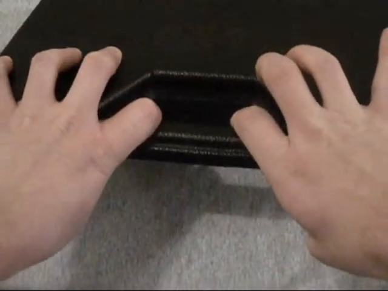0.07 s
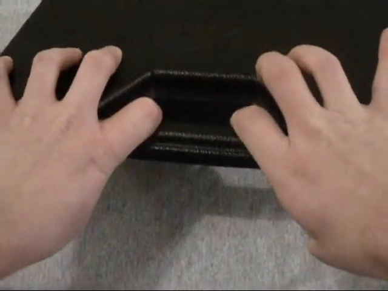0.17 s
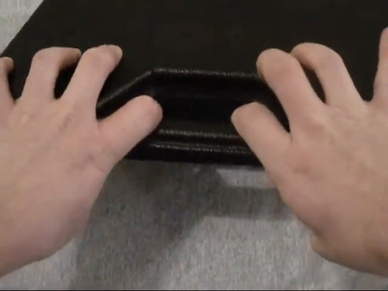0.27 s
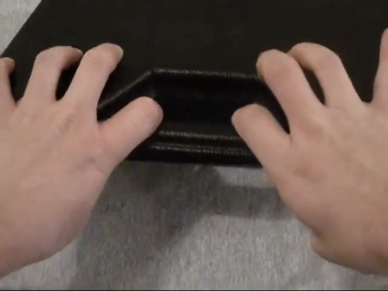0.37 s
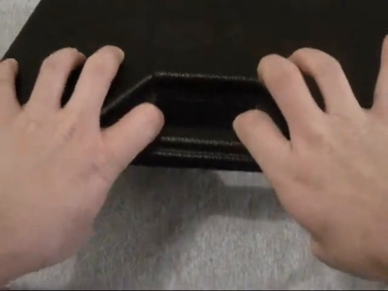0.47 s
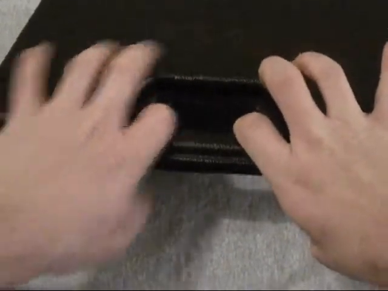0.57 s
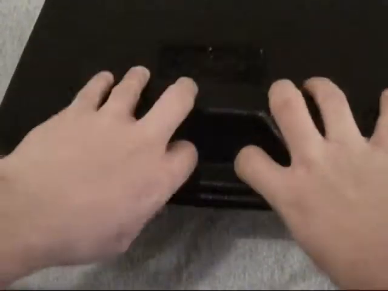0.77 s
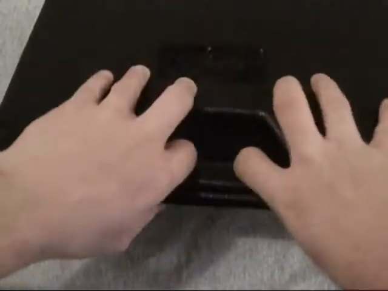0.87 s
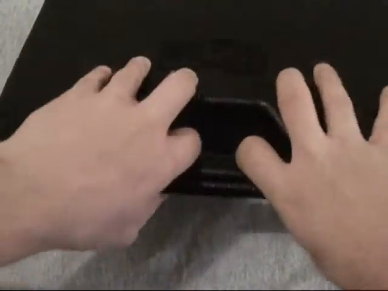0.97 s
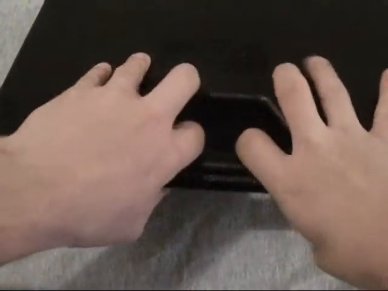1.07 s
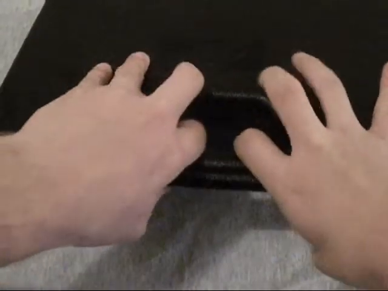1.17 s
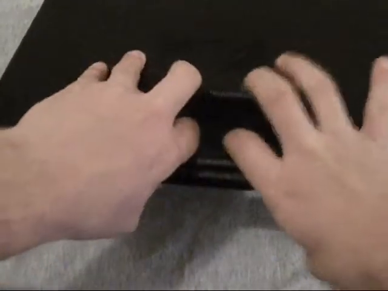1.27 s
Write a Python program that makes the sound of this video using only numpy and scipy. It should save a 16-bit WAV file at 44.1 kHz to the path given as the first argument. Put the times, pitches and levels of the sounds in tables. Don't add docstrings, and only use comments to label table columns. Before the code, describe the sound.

A hard plastic case latch snaps open loudly, then a softer snap and small handling clicks indoors

```python
import sys
import numpy as np
from scipy import signal
from scipy.fft import rfft, irfft
from scipy.io import wavfile
from scipy.ndimage import uniform_filter1d

SR = 44100
rng = np.random.default_rng(int(sys.argv[2]) if len(sys.argv) > 2 else 0)


def ratio_of_db(decibels):
    return 10 ** (np.asarray(decibels, float) / 20)


def to_wav(s):
    ch = np.atleast_2d(s).T
    pcm = np.round(np.clip(ch, -1, 1) * 32767)
    wavfile.write(sys.argv[1], SR, pcm.astype(np.int16))


N = 57330

# start in seconds, clack level in dB, clack pitch in Hz,
# tick level in dB, tick length in seconds.
LATCH_SNAPS = [
    (0.2338, -13.5, 1770, -1, 0.0019),
    (0.2364, -5, 1070, -12, 0.0061),
    (0.419, -38, 1510, -33, 0.0026),
    (0.424, -41, 1260, -25, 0.002),
    (.4249, -19.5, 900, -37.5, 0.0017),
    (0.4286, -26.5, 1040, -29, 0.0028),
    (0.4335, -32, 795, -40, 0.012),
    (0.446, -56, 880, -54, 0.0022),
]
# start in seconds, clack level in dB, clack pitch in Hz,
# tick level in dB, tick length in seconds.
LATCH_NUDGES = [(0.625, -41, 1080, -43, 0.0037), (0.7256, -26, 1120, -31, 0.0059),
                (0.7282, -30.5, 2130, -28, 0.0024), (0.752, -45, 1140, -39, 0.0037),
                (0.774, -34, 1820, -39, 0.004), (0.784, -39, 2260, -37, 0.0044),
                (.7913, -33, 3200, -39, 0.012), (0.7981, -25.5, 2200, -24, 0.0039),
                (0.829, -41, 2080, -37, 0.0064), (0.8864, -29.5, 1440, -39, 0.017),
                (0.8897, -26, 1810, -27, 0.0015), (0.8973, -26.5, 2040, -27, 0.0028),
                (0.956, -32.5, 1390, -30, 0.0036), (0.96, -38.5, 2110, -43, 0.0091),
                (0.995, -50, 3940, -42, 0.013), (0.9694, -37, 3380, -30, 0.0027),
                (.972, -34.5, 1000, -36, 0.0069), (0.98, -40.5, 2470, -44, 0.034),
                (1.008, -43, 2510, -40, 0.0089), (1.093, -54, 1090, -45, 0.015),
                (1.157, -40, 1210, -59, 0.0078), (1.283, -54, 1520, -44, 0.005)]


def evened(x):
    return x / np.sqrt(np.mean(x ** 2) + 1e-20)


def read(points, hz):
    f, value = np.transpose(points)
    return np.interp(np.log(hz + 1), np.log(f + 1), value)


def add(mix, s, sound):
    part = mix[round(s * SR):][:len(sound)]
    part += sound[:len(part)]


def coloured(x, points):
    return irfft(rfft(x) * ratio_of_db(read(points, np.fft.rfftfreq(len(x), 1 / SR))), len(x))


def ring(t, db, hz, rise, t60):
    decay = ratio_of_db(db - 60 * np.maximum(t - rise, 0) / t60)
    swell = np.sin(np.pi / 2 * np.minimum(t / rise, 1)) ** 2
    return decay * swell * np.sin(2 * np.pi * hz * t)


def hiss():
    # frequency in Hz, level in dB per Hz.
    hiss_colour = [(45, -13), (130, -6), (300, -0.5), (2500, -7), (6000, -15.5), (7800, -23), (9500, -19),
                   (15500, -22.5)]
    level_db, patchy_db = -48.5, 1.46
    frames, hz = N // 256 + 5, np.fft.rfftfreq(1024, 1 / SR)
    a, b, patches = rng.standard_normal((frames, 513, 3)).T
    patches = uniform_filter1d(patches, size=12, axis=0)
    patches = evened(uniform_filter1d(patches, size=12, axis=1))
    z = (a + 1j * b) * ratio_of_db(read(hiss_colour, hz)[:, None] + patchy_db * patches)
    return ratio_of_db(level_db) * evened(signal.istft(z, nperseg=1024, noverlap=768)[1][:N])


def rumble():
    level_db, top_hz = -66.5, 36
    low = signal.lfilter(*signal.butter(1, top_hz, fs=SR), rng.standard_normal(N))
    return ratio_of_db(level_db) * evened(low)


def fingers():
    # time in seconds, pressure in dB.
    pressure = [(0, -51), (0.101, -52.5), (.2, -62), (.42, -43.5), (.46, -52), (0.508, -44), (0.532, -92),
                (0.678, -59), (.72, -49), (.79, -45), (.85, -50), (.92, -46.5), (.96, -46), (1.015, -44),
                (1.04, -55), (1.17, -47), (1.219, -53), (1.3, -69)]
    # frequency in Hz, level in dB.
    lid_colour = [(100, -33), (220, -13), (330, 5.5), (500, -0.5), (1000, 6), (2400, -10.5), (6000, -12),
                  (15000, -22)]
    grains_per_s, spread_db = 2800, -4.5
    slips = rng.standard_normal(N) * ratio_of_db(spread_db * np.minimum(rng.exponential(1, N), 4))
    slips = slips * np.clip(grains_per_s / SR * 20 - 20 * rng.random(N), 0, 1)
    press_db = np.interp(np.arange(N) / SR, *np.transpose(pressure))
    return evened(coloured(slips, lid_colour)) * ratio_of_db(press_db)


def shell():
    # start in seconds, level in dB,
    # pitch in Hz, rise in seconds, time to fall 60 dB in seconds.
    snap_booms = [(.233, 11.5, 303.5, 0.0034, 0.0099), (0.2339, -3, 222.2, 0.0028, 0.13),
                  (0.239, -6, 324, 0.01, 0.12), (0.417, -31, 376, 0.0018, 0.059),
                  (0.427, -18.5, 267, 0.0086, 0.05), (.288, -35.5, 692, 0.0088, 0.1),
                  (0.29, -27.5, 490.6, 0.011, 0.2), (0.266, -23, 226, .01, 0.065),
                  (0.291, -24, 247, 0.0052, 0.08), (.315, -27.5, 373, 0.014, 0.082),
                  (0.339, -32.5, 459, .008, 0.086), (0.341, -22.5, 233, 0.0022, 0.067),
                  (0.4254, -20.5, 551, 0.0056, 0.026), (0.231, -21, 107, .006, 0.21),
                  (.2338, -15.5, 678, 0.0013, 0.084), (0.2336, -3, 1076, 0.0022, 0.02),
                  (0.2347, -12, 1430, 0.0006, .03), (.433, -44.5, 828, 0.0028, 0.35)]
    # start in seconds, level in dB, pitch in Hz,
    # rise in seconds, time to fall 60 dB in seconds.
    finger_knocks = [(0.035, -48, 224.5, 0.0048, 0.21), (0.099, -49, 248, 0.012, .06),
                     (0.489, -40, 239, 0.006, 0.074), (0.635, -45, 239, 0.0028, .06),
                     (0.928, -42, 118, 0.011, 0.1), (0.626, -41.5, 325, 0.0016, 0.023),
                     (0.7292, -24, 340, 0.0022, 0.047), (0.753, -35, 338, 0.0036, 0.039),
                     (0.778, -38, 300, 0.0047, 0.029), (0.8013, -24, 265, 0.00081, 0.025),
                     (0.827, -29, 320, 0.0013, 0.05), (0.844, -29, 276, 0.0013, 0.095),
                     (0.864, -33, 264, 0.0046, 0.045), (0.886, -21, 295, 0.0011, 0.042),
                     (0.886, -34.5, 426, 0.0012, 0.07), (0.885, -26.5, 190, 0.0012, 0.074),
                     (0.902, -29, 335, 0.0029, 0.062), (0.941, -40.5, 315, 0.0023, 0.37),
                     (.972, -33.5, 336, 0.0026, 0.026), (0.981, -30.5, 242, 0.0056, 0.039),
                     (0.999, -43.5, 341, 0.01, 0.17), (1.069, -42, 293.6, 0.0031, 0.39),
                     (1.11, -31, 263, 0.0081, 0.1), (1.146, -29.5, 300, 0.01, 0.03),
                     (1.157, -28, 275, 0.011, 0.035), (1.19, -35.5, 310, 0.0023, 0.03),
                     (1.225, -43, 312, 0.0086, 0.14), (1.279, -42.5, 263, 0.0025, 0.045)]
    out, t = np.zeros(N), np.arange(12000) / SR
    for s, *mode in snap_booms + finger_knocks:
        add(out, s, ring(t, *mode))
    return out


def pings():
    # start in seconds, level in dB, pitch in Hz, rise in seconds, time to fall 60 dB in seconds.
    latch_pings = [(.234, -26.5, 7630, .001, 0.17), (.234, -32, 8400, 0.0011, .17),
                   (.234, -42, 6860, .001, .1), (.234, -44, 9150, .001, .08),
                   (0.2316, -32, 12700, 0.0011, .015), (.235, -30, 14800, .001, .015),
                   (0.235, -15, 4050, 0.00065, 0.011), (.4249, -28.5, 6950, 0.00042, 0.011),
                   (0.4252, -30, 8970, .0005, .01), (.4249, -32, 14800, .0005, .01),
                   (0.428, -37, 7100, 0.00044, 0.024), (0.432, -41, 7760, .001, 0.045),
                   (.4335, -41, 8900, .001, 0.032), (0.4258, -20, 840, 0.00028, 0.016),
                   (0.4237, -29, 1120, 0.0015, 0.044), (.4286, -24, 886, 0.00057, 0.013),
                   (.4335, -26, 853, 0.00076, 0.053), (.444, -31, 665, 0.00078, .015),
                   (.7275, -31.5, 2090, 0.00078, 0.015), (0.8888, -25.5, 2070, 0.00088, 0.0091),
                   (.982, -44, 2330, .002, 0.028), (1.008, -38.5, 1064, 0.0038, 0.037),
                   (0.974, -34, 1250, 0.00081, .02), (0.729, -38, 10050, .0005, 0.013),
                   (0.7558, -33, 1220, 0.00064, .012), (0.79, -44, 4820, .001, .03),
                   (0.799, -35, 5750, .0005, .012), (0.8878, -33, 6130, .0005, 0.011),
                   (0.8978, -40, 4040, 0.00046, 0.01), (.898, -38.5, 6150, 0.00055, .015),
                   (.9535, -46, 6200, 0.00045, .012)]
    out, t = np.zeros(N), np.arange(12000) / SR
    for s, *mode in latch_pings:
        add(out, s, ring(t, *mode))
    return out


def latches():
    # ratio to the clack pitch, level in dB.
    overtones = [(0.92, 4), (1.58, -9), (0.576, -5.5), (2.66, -19)]
    # frequency in Hz, level in dB.
    snap_colour = [(1500, 10), (4000, -3), (6500, 2), (8500, 2.5), (11000, -4.5), (15500, -8)]
    # frequency in Hz, level in dB.
    nudge_colour = [(1500, 9), (3000, 0), (6000, -0.5), (8000, -7), (10000, -4.5), (12000, -7),
                    (14000, -8.5)]
    clack_rise_s, tick_rise_s = 0.0004, 0.00021
    long_contact_s, chatter_db, chatter_per_s = 0.0045, 2, 1000
    out, t = np.zeros(N), np.arange(2048) / SR
    for contacts, colour, cycles in [(LATCH_SNAPS, snap_colour, 13.4), (LATCH_NUDGES, nudge_colour, 10)]:
        tick_colour = [(100, -50), (500, -19)] + colour
        for s, clack_db, hz, tick_db, length in contacts:
            detune = np.r_[1, rng.uniform(.94, 1.06, 3)]
            clack = np.zeros(len(t))
            for (ratio, db), off in zip(overtones, detune):
                clack += ring(t, clack_db + db, hz * ratio * off, clack_rise_s, cycles / hz)
            if length > long_contact_s:
                when, how = rng.random((2, len(t)))
                slips = (when < chatter_per_s / SR) * (2 * how - 1)
                chatter = slips * ratio_of_db(chatter_db - 10 * t / length)
                clack = clack + signal.fftconvolve(chatter, clack)[:len(t)]
            shape = np.minimum(t / tick_rise_s, 1) * ratio_of_db(tick_db - 20 * t / length)
            tick = shape * evened(coloured(rng.standard_normal(len(t)), tick_colour))
            add(out, s, tick - clack)
    return out


def tail():
    # frequency in Hz, time to fall 60 dB in seconds.
    room_decay = [(120, 0.13), (300, 0.37), (1000, 0.35), (3000, 0.34), (8000, 0.37), (15000, 0.3)]
    build_s = 0.017
    taps = np.zeros(SR)
    at = np.arange(200, SR - 20, 20) + rng.integers(0, 20, (SR - 201) // 20)
    taps[at] = rng.choice([-1., 1.], at.shape)
    hz, t, z = signal.stft(taps, SR, nperseg=256)
    decay = ratio_of_db(-60 * t / read(room_decay, hz)[:, None])
    out = signal.istft(z * decay, SR, nperseg=256)[1][:SR]
    out = out * (1 - np.exp(-np.arange(SR) / SR / build_s))
    return out / np.linalg.norm(out)


def room(booms):
    # frequency in Hz, level in dB.
    wall_colour = [(240, -3), (420, 1), (1000, -3), (2200, -16), (5000, -27), (8000, -20), (10500, -29),
                   (15500, -25)]
    room_db, shell_to_room_db, boom_top_hz = 24, -11.5, 482
    low = signal.lfilter(*signal.butter(2, boom_top_hz, fs=SR), booms)
    out = ratio_of_db(shell_to_room_db) * signal.fftconvolve(low, tail())[:N]
    paths = [coloured(tail(), wall_colour) for _ in range(3)]
    whole_case_blow = (0.235, 1)
    for k, (s, level_db, *_) in enumerate(LATCH_SNAPS + LATCH_NUDGES + [whole_case_blow]):
        add(out, s, ratio_of_db(room_db + level_db) * paths[k % len(paths)])
    return out


def scene():
    low_cut_hz = 189
    booms = shell() + pings()
    case = fingers() + booms + latches() + room(booms)
    heard = signal.lfilter(*signal.butter(2, low_cut_hz, "high", fs=SR), case)
    return (heard + hiss() + rumble())[None]


def low_pass(x):
    return signal.sosfilt(signal.butter(12, 15660, fs=SR, output="sos"), x)


def record(dry):
    notch_hz, notch_width_hz = 8010, 360
    top_hz, edge_db_per_hz = 15600, 0.3
    knee_db, squeeze, hold_s, recover_db_per_s = -9, 0.72, 0.029, 344
    offset = -0.0039
    notched = signal.lfilter(*signal.iirnotch(notch_hz, notch_hz / notch_width_hz, SR), dry)
    edge_db = -np.clip((np.fft.rfftfreq(N, 1 / SR) - top_hz) * edge_db_per_hz, 0, 40)
    x = irfft(rfft(notched) * ratio_of_db(edge_db), N)
    power_db = 10 * np.log10(abs(uniform_filter1d(x[0] ** 2, size=132)) + 1e-12)
    t = np.arange(N) / SR
    since = t - t[power_db.argmax()]
    release_db = power_db.max() - recover_db_per_s * np.maximum(since - hold_s, 0)
    held_db = np.where(since > 0, release_db, power_db)
    duck_db = squeeze * uniform_filter1d(np.maximum(held_db - knee_db, 0), size=66)
    return low_pass(np.clip(x / ratio_of_db(duck_db) + offset, -1, 1))


dry = scene()
out = record(dry)
to_wav(out)
```